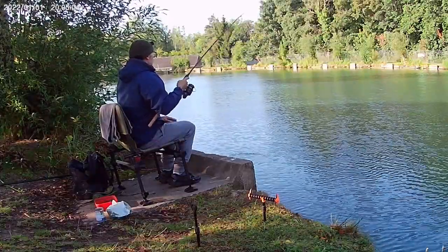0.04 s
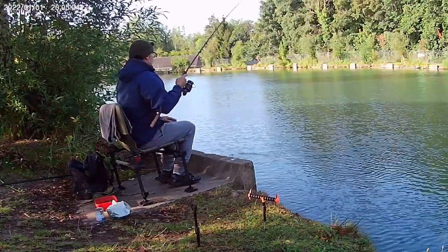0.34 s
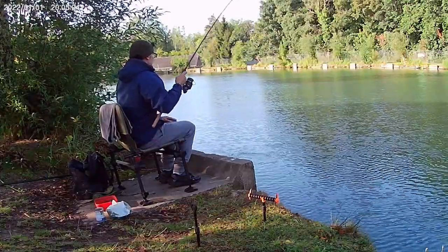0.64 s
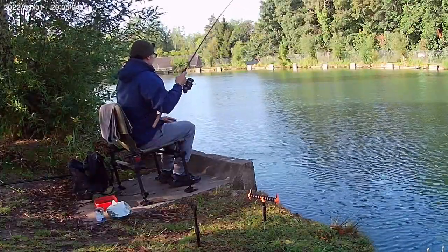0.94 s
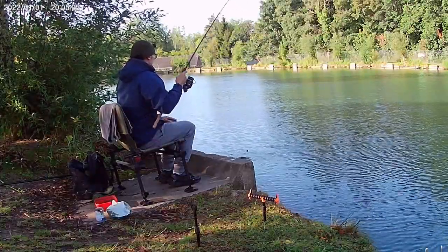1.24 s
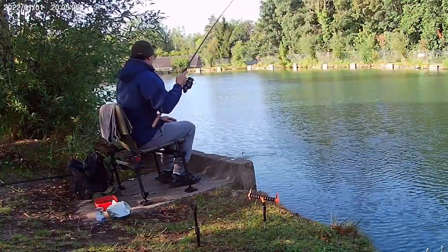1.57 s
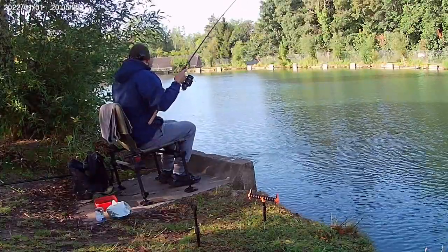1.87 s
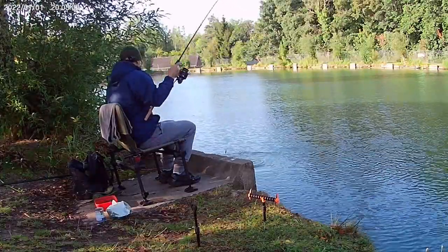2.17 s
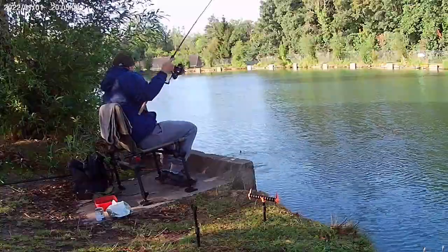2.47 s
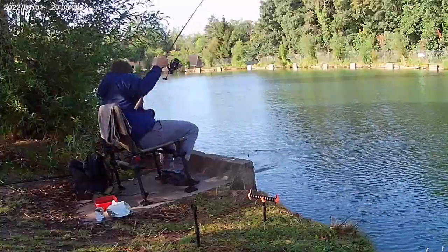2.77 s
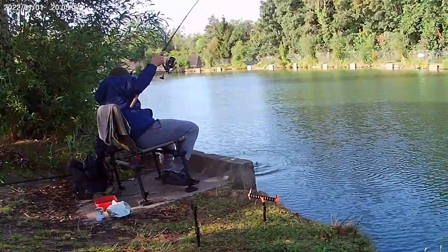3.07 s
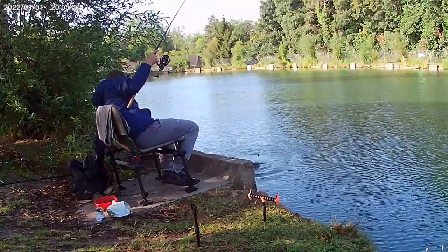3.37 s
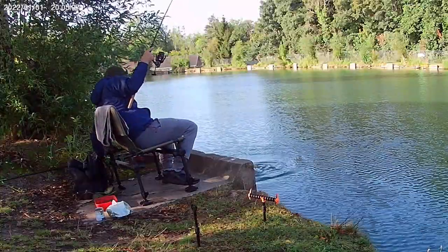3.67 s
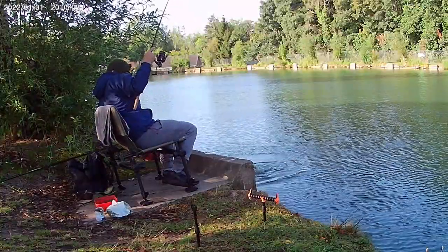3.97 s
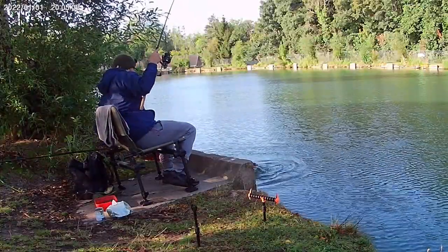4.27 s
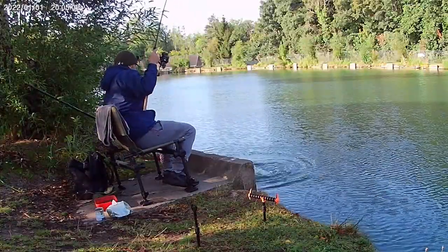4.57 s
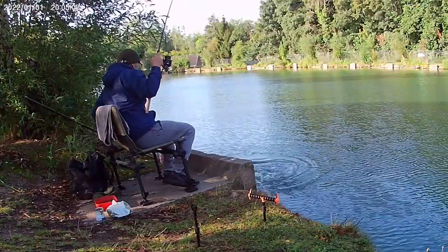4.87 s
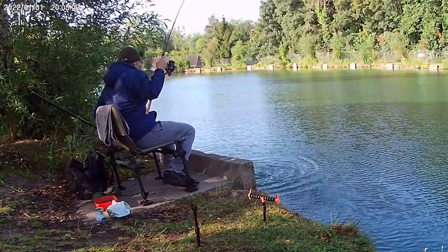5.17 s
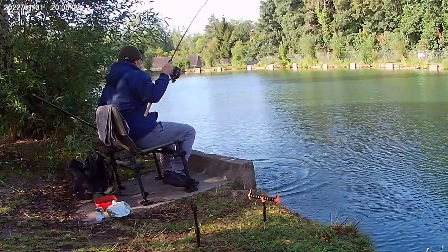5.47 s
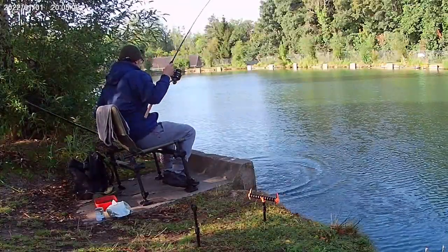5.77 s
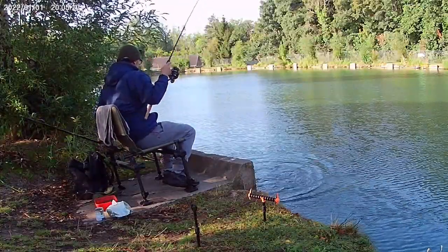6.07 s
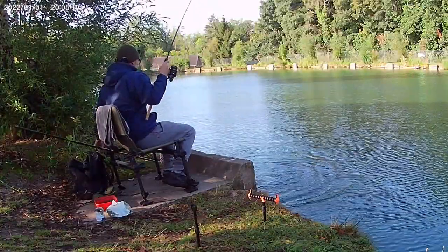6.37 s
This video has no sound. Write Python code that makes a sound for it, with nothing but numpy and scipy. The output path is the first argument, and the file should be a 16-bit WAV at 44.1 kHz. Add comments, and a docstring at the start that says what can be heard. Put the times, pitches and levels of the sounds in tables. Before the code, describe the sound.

A hooked fish swirls, then thrashes with loud splashes and gurgles near a lake bank, while wind buffets the microphone.

```python
"""A hooked fish swirls near a lake bank, then thrashes with loud splashes.
Its tail slaps the surface, trapped air rings as gulps and bubbles, and spray patters down.
The angler's tackle clicks twice and a far bird peeps. All along, wind buffets the microphone
over a soft, distant roar, a low hum and a thin hiss."""
import sys
import numpy as np
from scipy import signal
from scipy.fft import rfft, irfft, next_fast_len
from scipy.io import wavfile
from scipy.ndimage import uniform_filter1d, map_coordinates

SR = 44100
rng = np.random.default_rng(int(sys.argv[2]) if len(sys.argv) > 2 else 0)


def inscribe(sig):
    """Save sig as 16-bit PCM at rate SR to the path in sys.argv[1].

    A 1-D sig is mono; a 2-D sig holds one channel per row.
    Samples are clipped to [-1, 1] before scaling.
    """
    pcm = np.round(np.clip(np.atleast_2d(sig).T, -1, 1) * 32767)
    wavfile.write(sys.argv[1], SR, pcm.astype(np.int16))


N = 287399

# strokes of the thrashing fish: peak t/s, level/dB, large bubbles against small ones/dB
STROKES = [(4.444, -45.5, -2), (4.563, -45, 3), (4.605, -50.5, 6.5), (4.669, -45.5, 0.5), (4.765, -47.5, 8),
           (4.829, -43, -5), (4.91, -58.5, 9.5), (4.975, -49, -0.5), (5.11, -52.5, 6)]
STROKE_RISE_S, STROKE_FALL_S = 0.043, 0.073
GURGLE_LAG_S, SPRAY_DB, SPRAY_FALL_S = 0.02, -13.5, 0.087


def thrash():
    """In churned water small bubbles crackle, large ones gurgle just after, and spray fizzes on."""
    late_strokes = [(s + GURGLE_LAG_S, db + large_db, STROKE_FALL_S) for s, db, large_db in STROKES]
    gurgle = swells(late_strokes, STROKE_RISE_S)
    fizz = swells([(s, db + SPRAY_DB, SPRAY_FALL_S) for s, db, _ in STROKES], STROKE_RISE_S)
    large = bubble_swarm(count=2800, hz=600, spread=.33, cycles=22, size_db=2.5)
    small = bubble_swarm(count=4200, hz=1250, spread=.36, cycles=28, size_db=3)
    spray = bubble_swarm(count=4500, hz=3900, spread=.27, cycles=24, size_db=3)
    foam = noise([(1000, -4), (2300, 7.5), (3000, .5), (3900, -4), (6000, -5), (9000, 0), (15000, -50)])
    clumps = unit(amp(1.5 * wobble(160)))  # spray comes down unevenly
    return churning() * small + gurgle * large + fizz * clumps * (spray + amp(8.5) * foam)


def churning():
    """How hard the water churns: it swells and settles with each stroke."""
    return swells([(s, db, STROKE_FALL_S) for s, db, _ in STROKES], STROKE_RISE_S)


def bubble_swarm(count, hz, spread, cycles, size_db):
    """Many bubbles at random times, each a fading tone that rises as it nears the surface."""
    t = np.arange(SR // 40) / SR
    start = rng.integers(0, N, (count, 1))
    pitch = np.clip(hz * np.exp(spread * rng.standard_normal((count, 1))), 150, 14000)
    size = amp(size_db * np.minimum(rng.exponential(size=(count, 1)), 3))
    age = np.minimum(t * pitch / cycles, 2)
    shape = amp(-60 * age) * (1 - np.exp(-t * pitch))
    rings = size * shape * np.sin(2 * np.pi * pitch * t * (1 + .12 * age))
    positions = start + np.arange(len(t))
    return unit(np.bincount(positions.ravel(), rings.ravel())[:N])


# blows of tail and body on the water: t/s, level/dB, f/Hz, time for the patter to fade 60 dB/s
SLAPS = [(1.9225, -34, 1070, 0.027), (3.8285, -36, 1510, .015), (4.421, -33, 1300, 0.02),
         (4.4525, -40, 1200, .012), (4.4618, -20, 1250, 0.055), (4.475, -28.5, 670, 0.024),
         (4.545, -31.5, 1440, 0.095), (4.5718, -25, 1000, 0.046), (4.597, -41, 1100, .08),
         (4.607, -33, 850, .06), (4.644, -35, 1400, 0.14), (4.667, -32, 1400, 0.048),
         (4.679, -26, 760, 0.033), (4.6955, -29, 534, 0.07), (4.703, -36, 95, .1), (4.785, -41, 800, 0.07),
         (4.8125, -33, 1800, .02), (4.8205, -28.5, 680, 0.08), (4.8285, -38, 1500, 0.06),
         (4.837, -32, 1590, .03)]
# small bursts of droplets and faint ticks: same columns
FLICKS = [(1.338, -52, 2500, .06), (1.39, -57.5, 3700, .15), (1.583, -47, 2380, .05),
          (1.652, -48, 1900, .06), (1.892, -49, 1800, .06), (1.925, -50, 1800, 0.054),
          (2.746, -48.5, 4900, .06), (3.788, -40, 2250, .04), (3.829, -42, 2350, .03),
          (3.985, -47.5, 1920, .06), (4.085, -43, 1700, .02), (4.135, -43.5, 3080, 0.022),
          (4.194, -45, 1700, .025), (4.219, -45, 1700, .025), (4.257, -46, 1900, .035),
          (4.293, -42, 1600, .025), (4.438, -43, 3200, .04), (4.462, -43, 2400, .025),
          (4.489, -44.5, 3600, .05), (4.571, -36.5, 2550, 0.064), (4.667, -50, 3300, 0.065),
          (4.77, -39.5, 7900, .06), (4.819, -43, 3900, 0.063), (4.836, -42.5, 4050, .09),
          (4.929, -48, 2500, .025), (5.012, -43, 2300, .02), (5.212, -38, 2700, .01),
          (6.288, -52, 1500, .015)]


def splashes():
    """The fish smacks the water; lighter flicks are mostly the patter of drops."""
    return blows(SLAPS, sharpness=2.0, patter_db=-12.5) + blows(FLICKS, sharpness=4.3, patter_db=-1.5)


def blows(rows, sharpness, patter_db):
    """Each blow is one push and a fading patter. More sharpness gives a clearer pitch."""
    out, t = np.zeros(N), np.arange(SR // 8) / SR
    ratio = 1 + 1 / sharpness
    for s, db, hz, fade_s in rows:
        band = signal.butter(3, [hz / ratio, min(hz * ratio, SR / 3)], "band", fs=SR, output="sos")
        push = signal.sosfilt(band, signal.unit_impulse(len(t)))
        # cubed noise is spiky: a few drops land much harder than the rest
        patter = unit(signal.sosfilt(band, rng.standard_normal(len(t)) ** 3))
        dying = amp(-60 * t / fade_s) * (1 - np.exp(-t * hz))
        add(out, s, amp(db) * (push / np.abs(push).max() + amp(patter_db) * dying * patter))
    return out


# single air pockets: t/s, level/dB, starting f/Hz, fade time/s, pitch slide in that time/octaves
AIR_POCKETS = [(0.936, -36, 820, 0.006, -0.13), (0.947, -46, 1100, 0.021, 0.89),
               (1.285, -36, 760, 0.0097, 0.33), (1.364, -47, 1200, 0.0094, 0.11),
               (1.403, -43.5, 830, 0.036, 0.62), (1.595, -46, 544, 0.038, 0.69),
               (1.9, -39.5, 1150, 0.0078, 0.25), (1.935, -36.5, 533, 0.01, 0.55),
               (3.536, -45, 1840, 0.012, 0.15), (3.694, -40.5, 1170, 0.014, 0.24),
               (3.778, -44, 1290, 0.014, 0.31), (3.828, -37, 1310, 0.0089, 0.24),
               (4.4, -34, 736, 0.0078, 0.19), (4.4603, -25.5, 640, 0.0077, 0.38),
               (4.483, -36.5, 483, 0.024, -0.26), (4.531, -32, 318, 0.016, 0.42),
               (4.557, -36, 493, .018, 0.45), (4.569, -25, 680, 0.01, 0.27),
               (4.595, -30, 1097, 0.022, 0.12), (4.643, -35.5, 1280, 0.013, 0.068),
               (4.662, -35.5, 374, .035, .1), (4.675, -32, 740, 0.014, 0.094),
               (4.695, -25.5, 347, 0.02, 0.17), (4.702, -29.5, 620, 0.009, 0),
               (4.738, -33.5, 268, 0.025, 0.21), (4.76, -31, 363, 0.022, -0.00099),
               (4.785, -29.5, 390, 0.022, -0.24), (4.819, -24, 500, 0.0098, 0.28),
               (4.826, -33.5, 1370, 0.016, 0.33), (4.833, -36, 540, 0.017, 0.39),
               (4.907, -28.5, 400, 0.026, 0.33), (4.919, -35, 866, 0.0081, 0.067),
               (4.925, -35, 510, .016, 0.1), (4.962, -37, 866, 0.013, -0.074),
               (5.002, -37.5, 673, 0.018, 0.39), (5.005, -40, 470, 0.023, -0.44),
               (5.107, -38.5, 410, 0.015, 0.34)]
CALM_WAVER, CHURN_WAVER = 0.068, 0.087  # pitch waver in octaves: always, and added by full churning


def gulps():
    """A rising air pocket rings a short note that usually climbs; churning water roughens it."""
    out, churn = np.zeros(N), churning()
    for s, db, hz, fade_s, octaves in AIR_POCKETS:
        age = np.arange(int(2 * fade_s * SR)) / (fade_s * SR)
        rough = CALM_WAVER + CHURN_WAVER * churn[round(s * SR)] / churn.max()
        pitch = hz * 2 ** (octaves * age + rough * wobble(356)[:len(age)])
        shape = (1 - np.exp(-age / 0.055)) * np.exp(-2 * age ** 2)
        add(out, s, amp(db - 1) * shape / shape.max() * gliding_tone(pitch))
    return out


# turns of the fish just under the surface: peak t/s, level/dB, fall time/s
SWIRLS = [(1.372, -55.5, 0.052), (1.65, -63, .03), (1.905, -60, 0.018), (2.385, -56, 0.092),
          (3.55, -58.5, 0.083), (3.787, -52, 0.0099), (3.845, -53, 0.039), (4.13, -56, 0.041),
          (4.215, -54.5, .05), (4.265, -54.5, 0.07), (4.345, -56, 0.039)]


def swirl():
    """The fish stirs the surface into a soft slosh of little bubbles and droplets."""
    small = bubble_swarm(count=3600, hz=1550, spread=.27, cycles=22, size_db=2.5)
    spray = bubble_swarm(count=3000, hz=3700, spread=.3, cycles=16, size_db=2.5)
    return swells(SWIRLS, rise_s=0.035) * (small + amp(-7) * spray)


# single drops landing on the water: t/s, level/dB, f/Hz
DROPS = [(1.363, -43, 1680), (1.38, -50, 1800), (3.735, -46, 3480), (3.786, -40, 1350), (3.811, -47, 4650),
         (3.834, -40, 3850), (4.122, -41, 1350), (4.342, -40.5, 1420), (4.427, -36, 895)]


def droplets(cycles=23):
    """Each drop lands with a tiny plink that dies away in this many vibrations."""
    out, t = np.zeros(N), np.arange(SR // 25) / SR
    for s, db, hz in DROPS:
        shape = (1 - np.exp(-t * hz)) * amp(-60 * t * hz / cycles)
        add(out, s, amp(db) * shape / shape.max() * np.sin(2 * np.pi * hz * t))
    return out


# knocks of the tackle: t/s, level/dB, f/Hz above which the knock is dull
CLICKS = [(2.168, -31.5, 6000), (2.1919, -31.5, 1800)]
# tones the tackle rings with: f/Hz, level/dB, time to fade 60 dB/s
TACKLE_TONES = [(260, 4, 0.0094), (700, -9, 0.022), (1160, -5.5, 0.016), (1660, -1.5, 0.0076),
                (2300, -9, 0.014), (3430, -11, 0.0073), (5240, -12, .009)]


def tackle():
    """Short, dry knocks of rod and reel; a softer contact leaves the high tones quiet."""
    out, t = np.zeros(N), np.arange(SR // 16) / SR
    for s, db, dull_hz in CLICKS:
        for hz, tone_db, fade_s in TACKLE_TONES:
            strength = amp(db + tone_db + rng.normal(0, 1)) / (1 + (hz / dull_hz) ** 4)
            ring = amp(-60 * t / fade_s) * np.sin(2 * np.pi * hz * t)
            add(out, s, rng.choice([-1, 1]) * strength * ring)
    return out


# gusts on the microphone: t/s, level/dB
GUSTS = [(0.0, -44.5), (0.55, -39.5), (0.6, -31), (0.65, -40), (0.88, -44), (0.98, -37), (1.04, -46.5),
         (1.27, -37), (1.45, -42.5), (1.99, -46), (2.21, -37), (2.36, -45), (3.7, -45.5), (4.05, -42.5),
         (4.35, -38), (4.4, -47.5), (4.74, -36.5), (4.93, -43.5), (4.99, -38), (5.09, -40), (5.21, -31.5),
         (5.36, -33.5), (5.54, -44), (5.61, -32.5), (5.68, -44), (5.74, -32), (5.9, -40.5), (5.98, -36.5),
         (6.04, -39), (6.16, -41), (6.21, -28), (6.3, -37), (6.35, -35), (6.5, -40.5)]
# their deep rumble: f/Hz, level/dB
RUMBLE = [(12, -4), (20, 0.5), (30, 6.5), (42, -3.5), (56, 4), (75, -15), (88, -11), (108, -27.5),
          (145, -19), (200, -35), (330, -61), (700, -73.5)]


def wind(waver_db=1.27, wavers_per_s=15):
    """Whirls of air push on the microphone, as hard as each gust blows."""
    whirls = noise(RUMBLE)
    own_level = np.sqrt(np.abs(uniform_filter1d(whirls ** 2, size=SR // 6)))
    gust_db = curves(GUSTS)[0] + 2.67 + waver_db * wobble(wavers_per_s)
    return amp(gust_db) * whirls / own_level  # evened out, so the gusts set the loudness


# peeps of a small, far bird: t/s, level/dB, f/Hz, length/s
PEEPS = [(.052, -63, 5590, .02), (.392, -64, 5500, .022), (.518, -63, 5570, .02), (.704, -64, 5600, .018),
         (1.458, -62, 7270, 0.037), (1.965, -57, 5520, .016), (2.145, -61, 5700, .016),
         (2.273, -63, 5620, .016)]


def bird(tremble=0.012):
    """Thin, very short peeps that tremble and fall slightly."""
    out = np.zeros(N)
    for s, db, hz, length in PEEPS:
        age = np.linspace(0, 1, int(length * SR))
        pitch = hz * (1 + 0.013 * (.5 - age) + tremble * wobble(240)[:len(age)])
        add(out, s, amp(db) * np.sin(np.pi * age) * gliding_tone(pitch))
    return out


# tone colours of the background (the whoosh is the roar's upper part): f/Hz, level/dB
DRONE_COLOUR = [(40, -31), (72, -3.5), (88, -0.5), (108, -6), (140, -2), (180, -12), (300, -17.5),
                (600, -59)]
ROAR_COLOUR = [(50, 0.5), (100, 2), (160, 2), (230, 3), (300, -2), (380, -1), (550, -2), (950, 0),
               (1290, -5), (1420, -10), (2000, -19), (3000, -28.5), (6000, -37)]
WHOOSH_COLOUR = [(500, -35), (800, -3), (980, 0.5), (1150, -5.5), (1500, -36.5)]
HISS_COLOUR = [(1290, -39), (2200, 2.5), (3160, -2), (3720, 6), (4210, -0.5), (5090, 6.5), (6900, -1.5),
               (7430, -0.5), (9590, -10.5), (15100, -25), (15700, -7.5)]
# how the far sounds swell and fade: t/s, level/dB
DRONE_LEVEL = [(0, -47), (.9, -50.5), (1.7, -49.5), (2.1, -47), (2.8, -50.5), (4.6, -47.5), (5.3, -51.5),
               (5.8, -48), (6.5, -51.5)]
ROAR_LEVEL = [(0, -48.5), (1.3, -49.5), (2.6, -48), (3.6, -48.5), (6.5, -49)]
WHOOSH_LEVEL = [(1.8, -68), (2.7, -56.5), (3.4, -68), (5.4, -64), (6.1, -56.5), (6.5, -61)]
HUM_LEVEL = [(3.3, -59), (3.8, -51), (4.7, -42), (5.2, -48.5), (6.5, -47.5)]


def surroundings(hum_hz=87.6):
    """A low drone, a wavering hum and a soft roar from across the lake, under a steady hiss."""
    drone = amp(curves(DRONE_LEVEL)[0] + 0.47 * wobble(2.83)) * noise(DRONE_COLOUR)
    hum = amp(curves(HUM_LEVEL)[0] + 0.59 * wobble(7.4)) * gliding_tone(hum_hz + 1.4 * wobble(6))
    roar = amp(curves(ROAR_LEVEL)[0] + 0.55 * wobble(5.5)) * noise(ROAR_COLOUR)
    whoosh = amp(curves(WHOOSH_LEVEL)[0]) * noise(WHOOSH_COLOUR)
    hiss = amp(-63.5) * noise(HISS_COLOUR)
    return drone + hum + roar + whoosh + hiss


def bank_echo(x, fade_s, echo_db):
    """The bank and its trees add a faint, short echo to a sound."""
    t = np.arange(SR // 2) / SR
    tail = rng.standard_normal(len(t)) * amp(-60 * t / fade_s) * (t > .004)
    return x + amp(echo_db) * signal.fftconvolve(x, tail / np.linalg.norm(tail))[:N]


def gliding_tone(hz):
    """A pure tone that follows a changing pitch."""
    return np.sin(2 * np.pi * np.cumsum(hz) / SR)


def swells(rows, rise_s):
    """A volume curve from (t/s, level/dB, fall time/s) rows: each grows, peaks and dies away."""
    t, power = np.arange(N) / SR, np.zeros(N)
    for s, db, fall_s in rows:
        from_peak = np.maximum((s - t) / rise_s, (t - s) / fall_s)
        power += amp(2 * db) * np.exp(-2 * from_peak)
    return np.sqrt(power)


def amp(db):
    """Decibels to gain."""
    return 10 ** (np.asarray(db) / 20)


def unit(x):
    """Scale to rms 1."""
    return x / np.sqrt(np.mean(x ** 2) + 1e-20)


def along(points, hz):
    """(Hz, value) points read on a log axis."""
    f, v = np.transpose(points)
    return np.interp(np.log(hz + 1), np.log(f + 1), v)


def curves(rows):
    """One value per sample for each column after the time."""
    s, *cols = np.transpose(rows)
    return [np.interp(np.arange(N) / SR, s, c) for c in cols]


def wobble(rate):
    """A smooth random curve, rate knots a second."""
    return map_coordinates(rng.standard_normal(int(N * rate / SR) + 4), [np.arange(N) * rate / SR])


def filtered(x, response):
    """x times a response of frequency."""
    m = next_fast_len(N + SR // 2)
    return irfft(rfft(x, m) * response(np.fft.rfftfreq(m, 1 / SR)), m)[:N]


def noise(spectrum):
    """Coloured noise of rms 1."""
    return unit(filtered(rng.standard_normal(N), lambda hz: amp(along(spectrum, hz))))


def add(track, s, sound):
    """Mix a sound into a track at time s."""
    part = track[round(s * SR):][:len(sound)]
    part += sound[:len(part)]


# how the microphone's case colours the close sounds: f/Hz, level/dB
CASE_COLOUR = [(1650, -0.5), (2200, -5), (2700, -4), (3020, -13.5), (3750, 2.5), (4400, -5), (5300, 0),
               (6500, -11), (8000, -13), (11000, -19)]


def scene():
    """Fish and tackle near the bank, in the open air."""
    close = splashes() + swirl() + thrash() + gulps() + droplets() + tackle()
    echoed = bank_echo(close, fade_s=.2, echo_db=-16)
    near = filtered(echoed, lambda hz: amp(along(CASE_COLOUR, hz)))
    return (near + wind() + surroundings() + bird())[None]


def record(dry, top_hz=15750):
    """Cut away the very highest treble."""
    return filtered(dry[0], lambda hz: hz < top_hz)[None]


dry = scene()
out = record(dry)
inscribe(out)
```